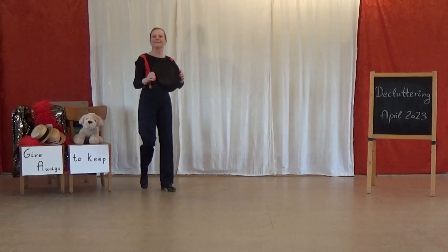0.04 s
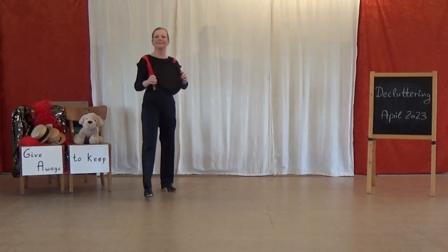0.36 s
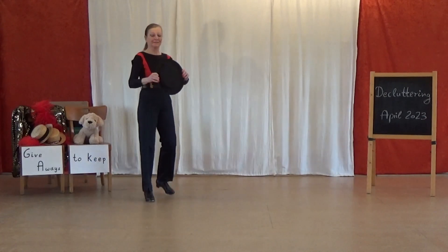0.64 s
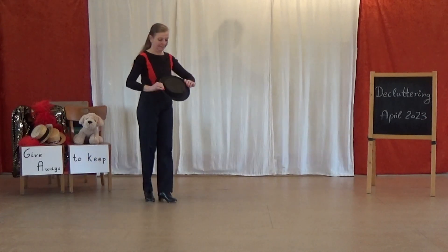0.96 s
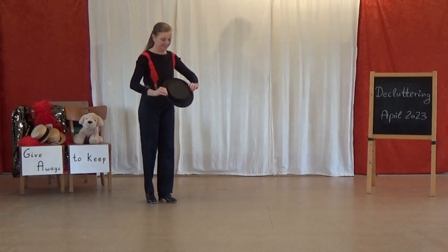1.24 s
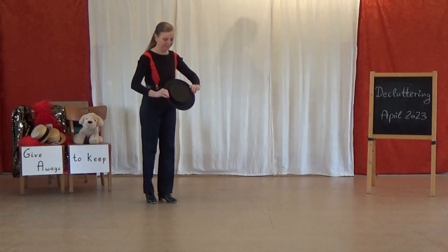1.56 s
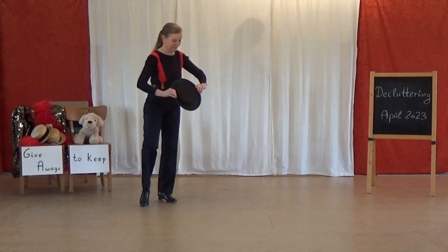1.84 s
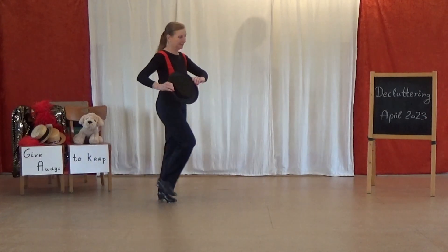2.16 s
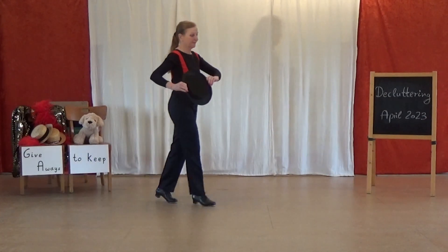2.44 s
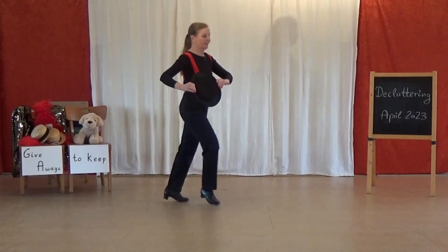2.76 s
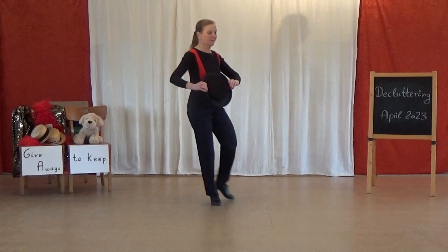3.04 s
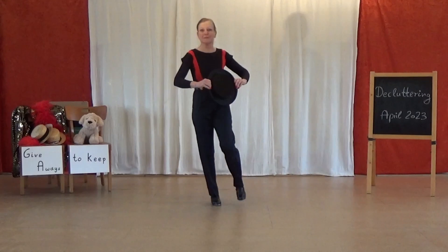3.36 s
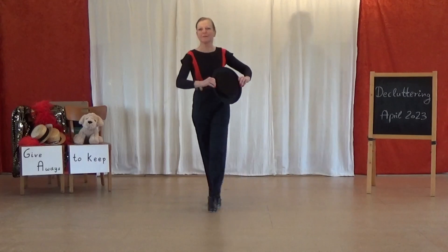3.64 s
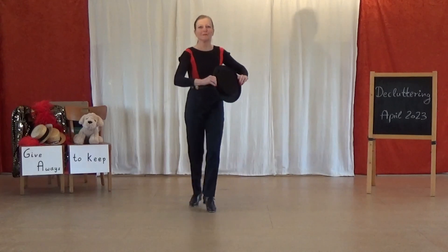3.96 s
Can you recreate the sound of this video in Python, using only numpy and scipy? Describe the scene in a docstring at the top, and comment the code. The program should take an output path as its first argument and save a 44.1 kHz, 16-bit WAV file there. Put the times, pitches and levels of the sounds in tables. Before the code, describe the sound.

A few soft steps, then swung tap dancing rings out in a reverberant hall.

```python
"""Tap dancer on a hard floor in a bare hall, a few metres off, over quiet hiss and faint chirring.
First soft steps around one tap (0.45 s), then a sole slide (1.2 s) and a plate-edge tick (1.8 s).
From 1.9 s a swung run of loud taps, some with a floor boom or a second plate contact.
Each tap thumps the floor and makes the shoe's metal plate clack and ring;
near surfaces slap it back, then the hall rings on."""
import sys
import numpy as np
from scipy import signal
from scipy.fft import rfft, irfft
from scipy.io import wavfile
from scipy.ndimage import uniform_filter1d, minimum_filter1d

SR = 44100
rng = np.random.default_rng(int(sys.argv[2]) if len(sys.argv) > 2 else 0)


def unload_audio(sound):
    """Save the sound as a 16-bit wav file, at the path given as the first command line argument."""
    columns = np.transpose(np.atleast_2d(sound))
    # keep every value between -1 and 1, then stretch to whole-number steps
    steps = np.round(np.clip(columns, -1, 1) * 32767)
    wavfile.write(sys.argv[1], SR, steps.astype(np.int16))


N = 176400
FFT_SIZE, TAIL_SAMPLES = 4096, int(1.35 * SR)
TIME_S = np.arange(N) / SR
HZ = np.maximum(np.arange(FFT_SIZE // 2 + 1) * SR / FFT_SIZE, 1)
FINE_HZ = np.maximum(np.arange(N // 2 + 1) * SR / N, 1)

# background hiss (frequency [Hz], level [dB])
HISS_SPECTRUM = [(30, -5), (60, 0), (200, 0), (400, -3), (800, -7.5), (1200, -9), (1900, -11), (2600, -12),
                 (3300, -13), (8000, -13), (11000, -16)]
# soft steps and weight shifts (time [s], thud [dB], knock [dB], plate [dB])
SOFT_STEPS = [(.002, -41.5, -46, -49), (.576, -40.5, -56, -67), (0.958, -52, -63, -57),
              (1.014, -48.5, -52.5, -57), (1.030, -56, -61, -56), (1.225, -53.5, -62.5, -53.5),
              (3.795, -31.5, -39, -28.5)]
# floor thud (frequency [Hz], level [dB])
THUD_SPECTRUM = [(25, -43), (60, -21), (100, -10.5), (135, -2.5), (190, 1), (250, 1), (320, -5), (450, -10),
                 (900, -21.5), (3000, -38)]
# floor knock (frequency [Hz], level [dB])
KNOCK_SPECTRUM = [(80, -48), (300, 8), (550, 2), (800, 0.5), (1300, 4), (1800, -4.5), (2900, -21),
                  (6000, -10), (11000, -41)]
# taps (time [s], thud [dB], knock [dB], clack [dB], clack [Hz], ring [dB], ring [Hz],
#       sizzle [dB], near-path gain [dB])
TAP_HITS = [(0.4533, -42.5, -70, -37, 2320, -50, 4200, -56.5, 0.5),
            (1.9190, -36.5, -33, -25.5, 1890, -32.5, 3740, -37.5, -2.5),
            (2.071, -33.5, -30, -27.5, 2100, -27, 4770, -30, 0),
            (2.3504, -32.5, -27.5, -24, 2080, -23, 3630, -30.5, -4),
            (2.4975, -30, -33.5, -23.5, 2243, -28.5, 3830, -27, -2.5),
            (2.7486, -34.5, -31, -29.5, 2030, -37, 3570, -55, 1.5),
            (2.8739, -31, -28.5, -20.5, 2180, -26.5, 4000, -28, -7),
            (3.1438, -32, -24, -21.5, 1995, -27.5, 3850, -36, 0),
            (3.3073, -28, -26.5, -19.5, 1910, -21, 3940, -29, 2),
            (3.5562, -31.5, -24, -19.5, 2090, -24, 3770, -33.5, -3),
            (3.7342, -29, -31, -19, 2110, -33.5, 4530, -36, -6.5),
            (3.9975, -19, -54, -19.5, 2126, -11.5, 4200, -9.5, -12.5)]
# metal sizzle (frequency [Hz], level [dB])
SIZZLE_SPECTRUM = [(800, -31), (3000, -16), (5000, 8), (6200, 9.5), (7000, 5.5), (8200, 2), (9600, 4.5),
                   (11000, -6)]
# modes and gaps common to the plates (centre [Hz], width [Hz], gain [dB])
PLATE_MODES = [(1800, 480, 1), (2570, 420, 0.5), (3124, 340, -4.5), (3770, 220, 2), (4450, 440, -0.5),
               (6230, 140, -1.5), (6880, 610, -3), (7000, 200, 4.5), (8340, 340, 5), (9170, 290, 2)]
# sliding sole (frequency [Hz], level [dB])
SLIDE_SPECTRUM = [(300, 4), (1000, -11), (2000, 4), (3500, -1), (7000, -2.5), (10000, -4.5), (11000, -9)]
# plate-edge ticks (time [s], level [dB], near-path gain [dB])
EDGE_TICKS = [(1.7816, -51, -0.5)]
# plate edge (frequency [Hz], level [dB])
TICK_SPECTRUM = [(200, 7), (1000, -7), (2500, 3), (4200, -1.5), (8000, -1.5), (11000, -9.5)]
# full-weight landings (time [s], level [dB])
HEAVY_LANDINGS = [(2.076, -45), (2.502, -42)]
# second plate contacts (time [s], level [dB], centre [Hz])
PLATE_SLAPS = [(2.5062, -32, 8200), (2.5114, -30.5, 3000), (2.8752, -26.5, 2880), (2.8768, -33.5, 9500),
               (3.3171, -28, 5430), (3.3167, -43, 8600), (3.7595, -30.5, 2080)]
# direct path against 1 s of hall sound (frequency [Hz], gain [dB])
DIRECT_SPECTRUM = [(200, -24), (1000, -20.5), (2000, -20), (4500, -19.5), (7000, -18.5), (10500, -13.5)]
# echoes off near surfaces (delay [s], gain [dB])
EARLY_ECHOES = [(.0047, -16.5), (.0088, -29.5), (0.0144, -25.5), (0.0183, -20.5), (.0260, -32)]
# colour of those echoes (frequency [Hz], gain [dB])
ECHO_SPECTRUM = [(300, -7.5), (2000, -8), (4200, 0.5), (7000, 0.5), (10500, -1)]
# hall decay (band centre [Hz], T60 [s])
HALL_DECAY = [(100, 1.79), (250, 0.98), (700, 1.53), (2000, 1.34), (4000, 1.17), (7000, 1), (11000, 0.55)]
# low resonances of hall and floor (centre [Hz], width [Hz], gain [dB])
LOW_MODES = [(60, 7, 1), (123.4, 13.4, 6.5), (186.3, 10.3, 4), (229, 8.2, 1.5), (300, 7.3, 2), (532, 22, 6),
             (724, 17, 3)]
# diffuse-field width (frequency [Hz], side against mid [dB])
STEREO_WIDTH = [(60, -14), (150, -17.5), (350, -10), (650, -7.5), (1200, -6), (2200, -6), (4000, -7.5),
                (10000, -5.5)]

CONTACT_S = .0011  # time a plate takes to settle


def amp(db):
    return 10 ** (np.asarray(db) / 20)


def curve(points, hz=HZ):
    """Interpolate (frequency [Hz], value) rows on a log-frequency axis."""
    at, value = np.array(points, float).T
    return np.interp(np.log(hz), np.log(at), value)


def unit_power(gain):
    return gain / np.sqrt(np.mean(gain ** 2))


def colour(points, hz=HZ):
    """Unit-power response of a spectrum table."""
    return unit_power(amp(curve(points, hz)))


def resonance(hz, q):
    """Broad mode cluster with steep skirts."""
    return unit_power(1 / np.hypot(1, abs(q * (HZ / hz - hz / HZ)) ** 2.07))


def peaks(modes, hz=HZ):
    """Gain of narrow peaks and gaps."""
    return amp(sum(db / (1 + (2 * (hz - centre) / width) ** 2) for centre, width, db in modes))


def min_phase(*parts):
    """Spectrum of the shortest pulse with the parts' summed power."""
    cepstrum = irfft(np.log(sum(p ** 2 for p in parts) + 1e-14) / 2)
    return np.exp(rfft(2 * cepstrum[:FFT_SIZE // 2], FFT_SIZE) - cepstrum[0])


def add(out, sound, start_s):
    i = int(np.clip(start_s * SR, 0, N - 1))
    out[:, i:i + sound.shape[1]] += sound[:, :N - i]


def diffuse():
    """Left and right noise spectra, as wide as the hall."""
    mid, side = rfft(rng.standard_normal((2, N)))
    return mid + np.array([[1], [-1]]) * side * amp(curve(STEREO_WIDTH, FINE_HZ))


def noise(points):
    return irfft(diffuse() * colour(points, FINE_HZ), N)


def hiss(level_db=-62):
    """Steady quiet of the hall."""
    return amp(level_db) * noise(HISS_SPECTRUM)


def chirr(rate_hz=25.2, pulse_at_s=1.617, half_width_s=.005, pitch_hz=2600, level_db=-65):
    """Faint narrow-band pulses, evenly spaced."""
    offset_s = (((TIME_S - pulse_at_s) * rate_hz + .5) % 1 - .5) / rate_hz
    band = noise([(pitch_hz * 0.85, -40), (pitch_hz, 0), (pitch_hz * 1.25, -40)])
    return amp(level_db) * np.exp(-(offset_s / half_width_s) ** 2) * band


def soft_steps(cutoff_hz=3500):
    """Soft contact excites floor and plate with little treble."""
    lowpass = min_phase(1 / np.hypot(1, (HZ / cutoff_hz) ** 2))
    thud, knock, plate = colour(THUD_SPECTRUM), colour(KNOCK_SPECTRUM), resonance(hz=2380, q=1.18)
    for time_s, thud_db, knock_db, plate_db in SOFT_STEPS:
        step = min_phase(amp(thud_db) * thud, amp(knock_db) * knock, amp(plate_db) * plate)
        yield time_s, lowpass * step, 0


def settling(grain_hz=696):
    """The plate settles: bands start a moment apart, spreading the click into a burst."""
    grid_hz = np.arange(80) * grain_hz
    delay_s = CONTACT_S * np.interp(HZ, grid_hz, rng.random(len(grid_hz)))
    return np.exp(-2j * np.pi * np.cumsum(delay_s) * SR / FFT_SIZE)


def near_paths():
    """Impulse response of direct path and early echoes, both brighter than the hall."""
    direct = min_phase(amp(curve(DIRECT_SPECTRUM)))
    delays = sum(amp(db) * np.exp(-2j * np.pi * HZ * delay_s) for delay_s, db in EARLY_ECHOES)
    echoes = min_phase(amp(curve(ECHO_SPECTRUM))) * delays
    return np.sqrt(SR) * irfft((direct + echoes) * settling())[:FFT_SIZE // 2]


def hall_bands(gap_s=0.0013, build_s=0.0094):
    """Reverberation per band: diffuse noise and its build-and-decay envelope."""
    field, t = diffuse() * peaks(LOW_MODES, FINE_HZ), TIME_S[:TAIL_SAMPLES]
    centres_hz = [hz for hz, _ in HALL_DECAY]
    build = 1 - np.exp(-np.maximum(t - gap_s, 0) / build_s)
    for share, (_, t60_s) in zip(np.eye(len(HALL_DECAY)), HALL_DECAY):
        band = irfft(field * curve(list(zip(centres_hz, share)), FINE_HZ), N)
        yield band, build * np.exp(-np.log(1000) * t / t60_s)


def floor_wave(clack_db, clack_hz, length_s=0.0054, rise_s=0.0013, gain_db=-16.5):
    """The floor carries a few swelling cycles of the clack ahead of the airborne click."""
    t = np.arange(int(length_s * SR)) / SR
    swell = np.exp(t / rise_s) * signal.windows.tukey(len(t), .3)
    wave = swell * np.sin(2 * np.pi * (clack_hz * t + rng.random()))
    return amp(clack_db + gain_db) * wave[None] / np.sqrt(np.sum(wave ** 2) / SR)


def strike_point(spread_db=3, grain_hz=108.3, full_above_hz=4000):
    """Each contact point favours other upper modes, giving a short metallic ring."""
    grid_hz = np.arange(160) * grain_hz
    ripple = np.interp(HZ, grid_hz, np.clip(rng.standard_normal(len(grid_hz)), -2, 2))
    return unit_power(amp(spread_db * ripple * np.minimum(HZ / full_above_hz, 1)))


def taps():
    """Plate strikes floor: the floor thuds and knocks; the metal clacks, rings and sizzles."""
    for time_s, thud_db, knock_db, clack_db, clack_hz, ring_db, ring_hz, sizzle_db, near_db in TAP_HITS:
        tap = min_phase(amp(thud_db) * colour(THUD_SPECTRUM),
                        amp(knock_db) * colour(KNOCK_SPECTRUM),
                        amp(clack_db) * resonance(clack_hz, q=2.3),
                        amp(ring_db) * resonance(ring_hz, q=3.76),
                        amp(sizzle_db) * colour(SIZZLE_SPECTRUM))
        yield time_s, tap * min_phase(peaks(PLATE_MODES) * strike_point()), near_db


def slide(peak_s=1.207, rise_s=0.039, fall_s=0.088, level_db=-47):
    """A sole swishes briefly over the floor."""
    swell = np.exp(-np.maximum(peak_s - TIME_S, 0) / rise_s - np.maximum(TIME_S - peak_s, 0) / fall_s)
    return amp(level_db) * swell * noise(SLIDE_SPECTRUM)


def edge_ticks():
    """A plate's edge touches the floor lightly."""
    for time_s, db, near_db in EDGE_TICKS:
        yield time_s, min_phase(amp(db) * colour(TICK_SPECTRUM) * strike_point()), near_db


def landings():
    """Full body weight makes the floor boom."""
    for time_s, db in HEAVY_LANDINGS:
        yield time_s, min_phase(amp(db) * resonance(hz=92, q=0.79)), 0


def slaps():
    """The rest of the plate comes down just after a tap."""
    for time_s, db, hz in PLATE_SLAPS:
        yield time_s, min_phase(amp(db) * resonance(hz, q=4.3) * strike_point()), 0


def footwork(floor_lead_s=0.004405):
    """Each blow arrives by the near paths and through the hall, differently from each floor spot."""
    out, bands = np.zeros((2, N)), list(hall_bands())
    for source in (taps, slaps, soft_steps, landings, edge_ticks):
        for time_s, spectrum, near_db in source():
            spot = rng.integers(N - TAIL_SAMPLES)
            paths = sum(band[:, spot:spot + TAIL_SAMPLES] * envelope for band, envelope in bands)
            paths[:, :FFT_SIZE // 2] += amp(near_db) * near_paths()
            blow = signal.fftconvolve(paths, irfft(spectrum)[None], axes=1)
            add(out, blow, time_s - CONTACT_S / 2)
    for time_s, _, _, clack_db, clack_hz, *_ in TAP_HITS:
        add(out, floor_wave(clack_db, clack_hz), time_s - floor_lead_s)
    return out


def scene(right_over_left_db=0.33):
    """Dancer near the centre, over hiss and chirring."""
    pan = amp(np.array([[-0.5], [0.5]]) * right_over_left_db)
    return (footwork() + slide()) * pan + hiss() + chirr()


def record(dry, ceiling=0.48, window_s=0.0031, cutoff_hz=11000):
    """Fast peak limiter, then a steep low-pass."""
    window = int(window_s * SR)
    needed_gain = ceiling / np.maximum(abs(dry).max(axis=0), ceiling)
    gain = uniform_filter1d(minimum_filter1d(needed_gain, window), window)
    lowpass = signal.ellip(10, .2, 70, cutoff_hz, fs=SR, output="sos")
    return signal.sosfilt(lowpass, dry * gain)


dry = scene()
out = record(dry)
unload_audio(out)
```